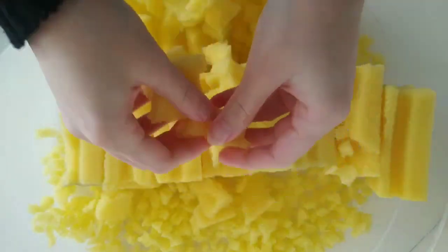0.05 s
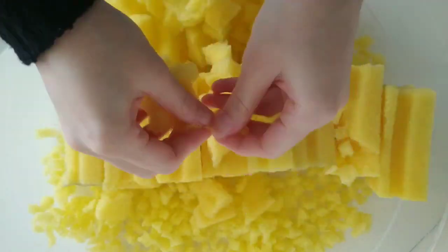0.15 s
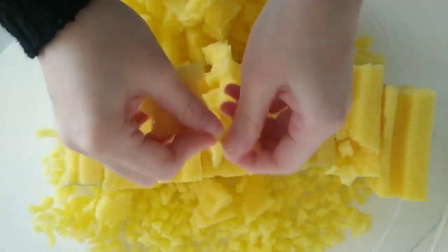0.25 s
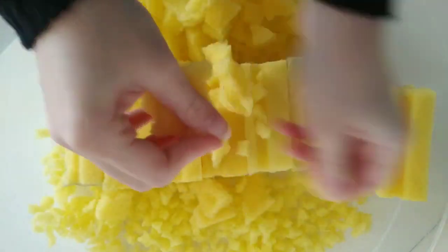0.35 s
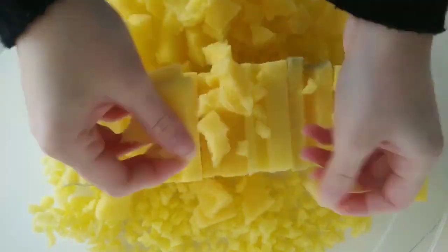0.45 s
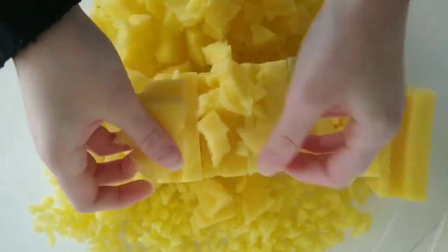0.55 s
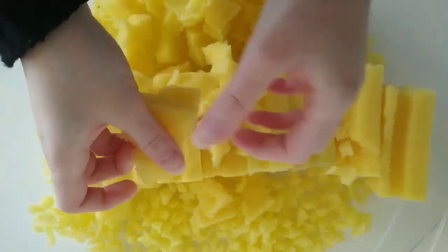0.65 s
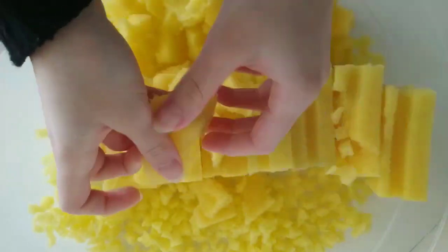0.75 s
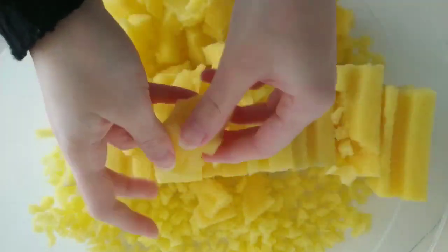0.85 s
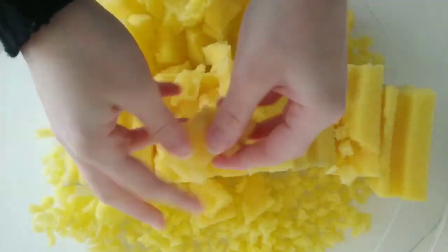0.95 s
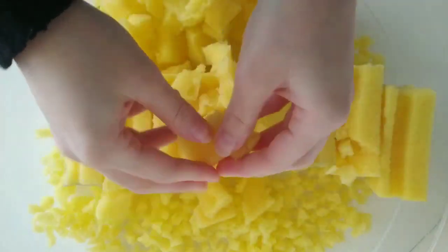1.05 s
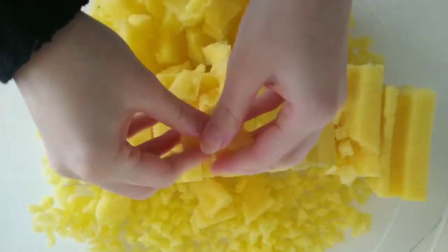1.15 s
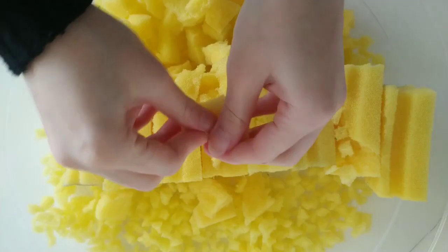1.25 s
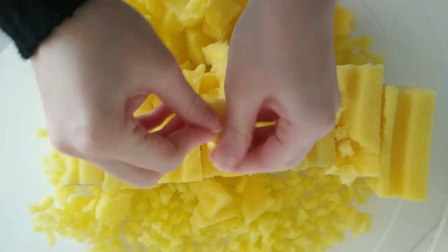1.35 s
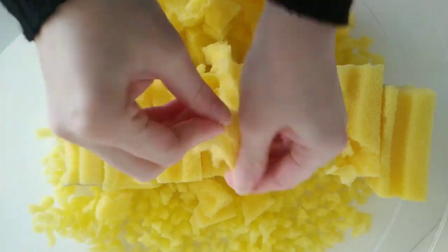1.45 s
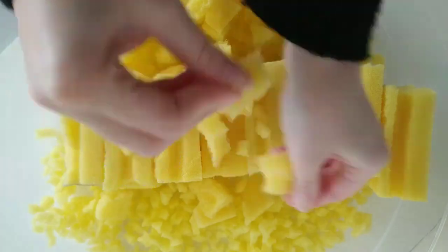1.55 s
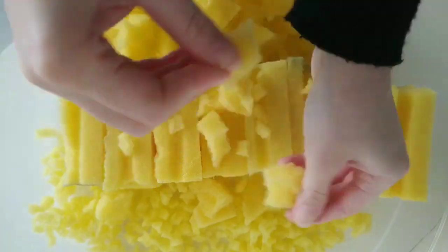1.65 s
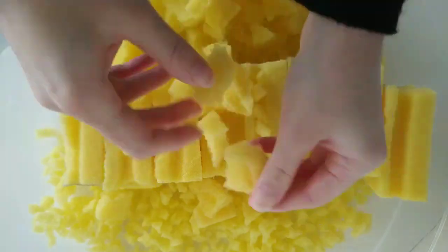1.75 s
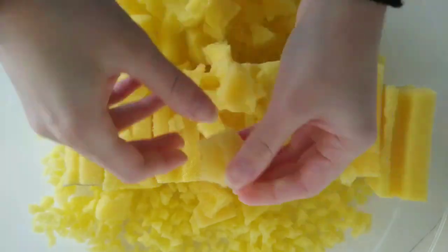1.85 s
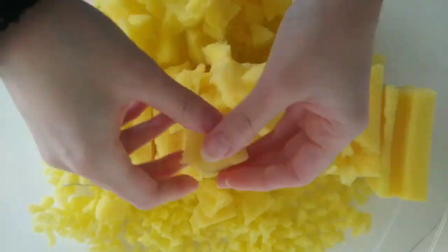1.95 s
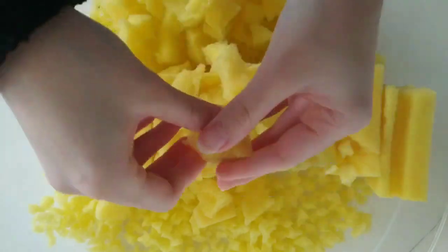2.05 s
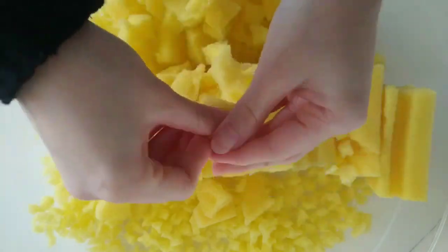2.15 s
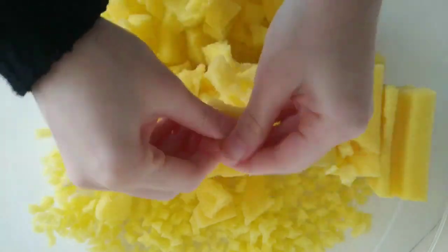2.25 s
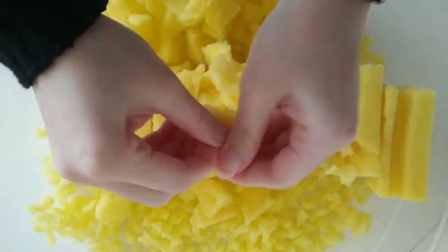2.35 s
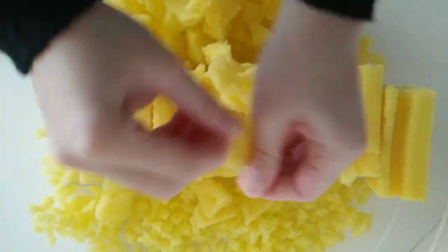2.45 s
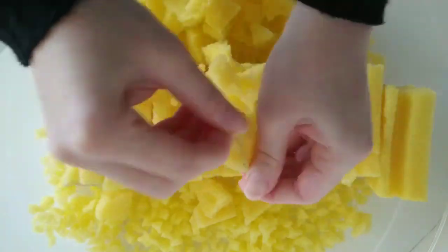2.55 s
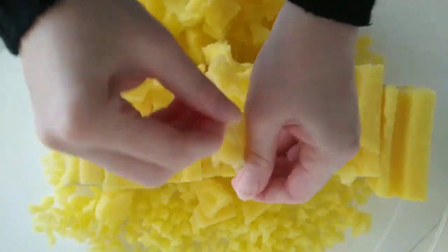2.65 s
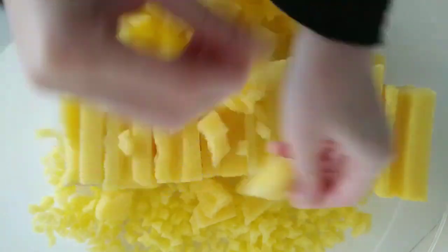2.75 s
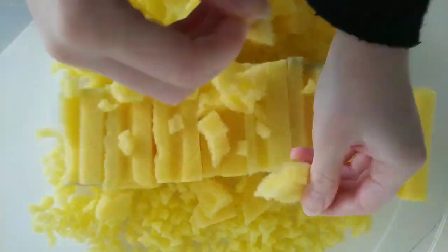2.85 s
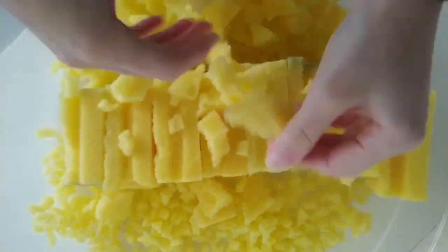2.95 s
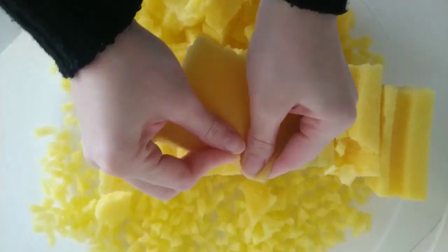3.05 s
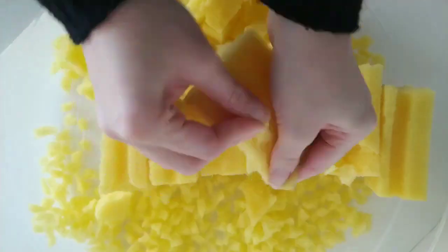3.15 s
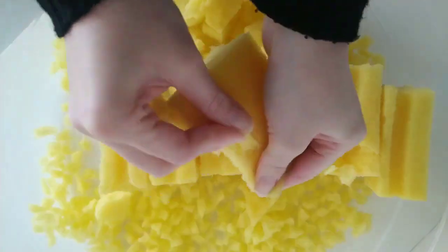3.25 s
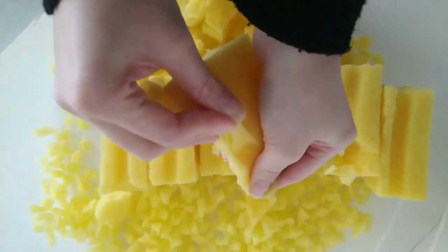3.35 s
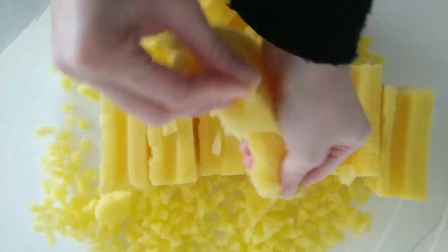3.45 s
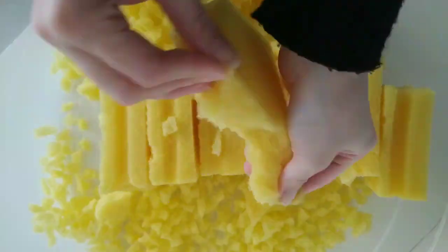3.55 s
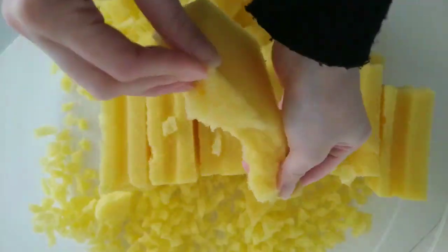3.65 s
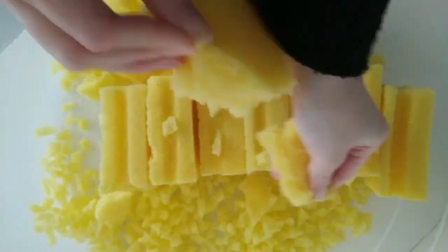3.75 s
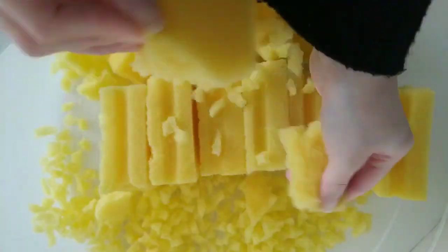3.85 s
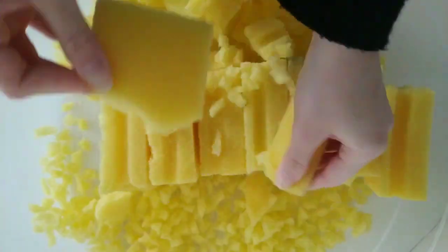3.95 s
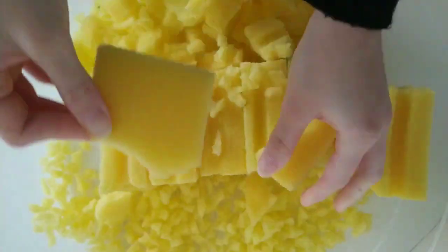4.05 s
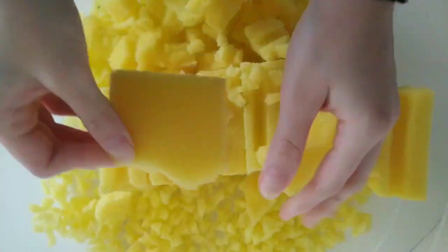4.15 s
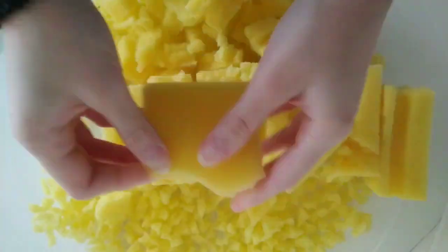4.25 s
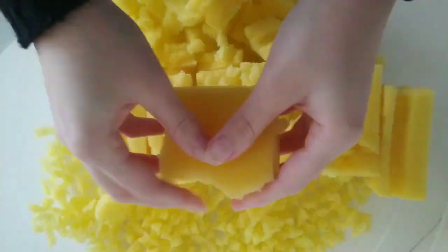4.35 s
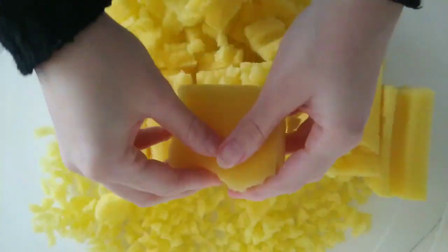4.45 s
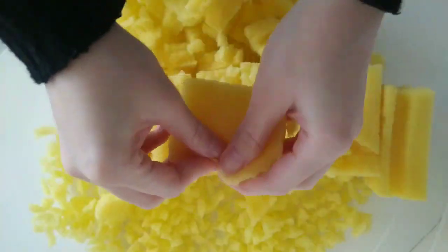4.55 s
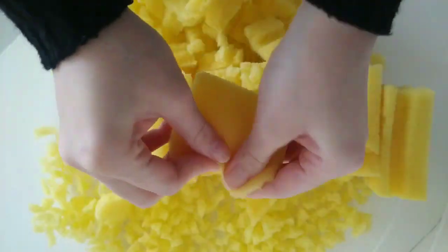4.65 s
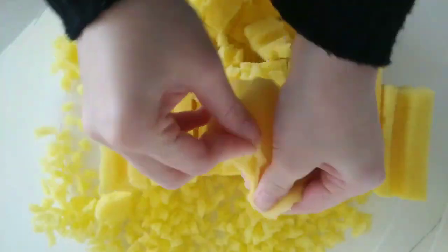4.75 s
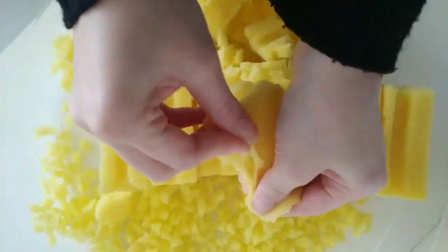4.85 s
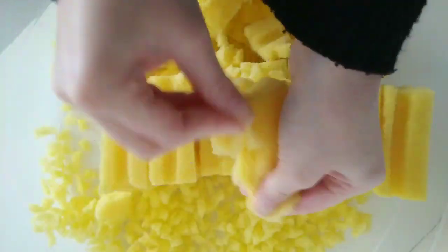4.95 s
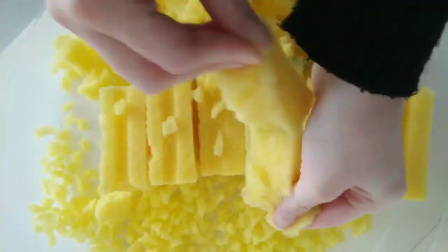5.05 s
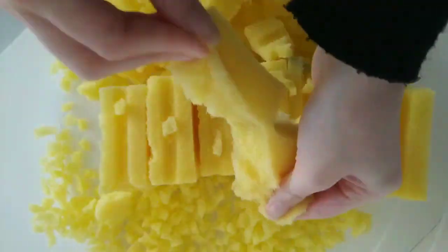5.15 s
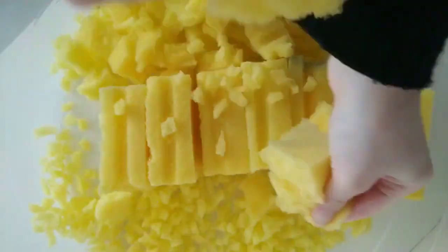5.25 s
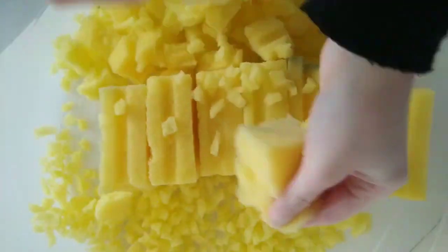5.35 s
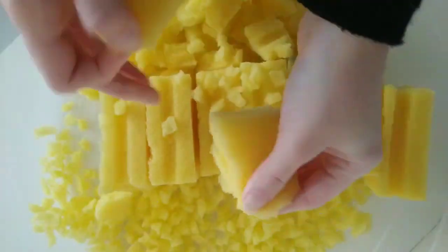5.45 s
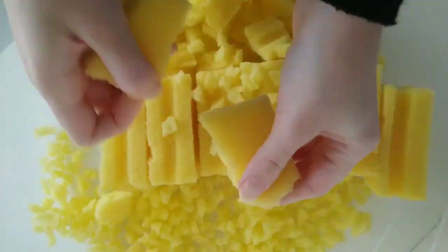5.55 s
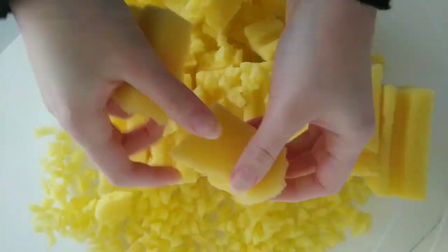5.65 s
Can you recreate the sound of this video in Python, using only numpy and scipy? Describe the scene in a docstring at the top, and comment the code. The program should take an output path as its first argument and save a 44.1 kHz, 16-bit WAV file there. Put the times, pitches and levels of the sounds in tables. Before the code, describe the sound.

Close, nearly central sound of brittle foam being ripped: dense tiny crackles that swell and stop abruptly. Thin strips give brief, airy tears in the first three seconds; a thick piece then tears harder and fuller in two groups, each ending with a snap and a dull flap of freed foam. Fingers brush and lightly squeak on the foam between. Short room reflections, slight treble width, low murmur and soft hiss underneath.

```python
"""A dry foam sponge is torn by hand close to a microphone in a small, quiet room: thin strips, then a slab.
Each tear is a dense run of random clicks, the snapping cell walls, that come faster with the pull.
The clicks excite colouring filters, the foam body and the hollow between the hands; tough strands tick.
Freed foam flaps back as damped swings, and fingers brush the foam as fine-grained noise.
Room reflections follow, the treble has a slight stereo spread, and a room murmur lies beneath."""
import sys
import numpy as np
from scipy import signal
from scipy.fft import rfft, irfft
from scipy.io import wavfile

SR = 44100
rng = np.random.default_rng(int(sys.argv[2]) if len(sys.argv) > 2 else 0)


def output_pcm(signal):
    """Save a mono or channel-first signal as 16-bit PCM at the path in sys.argv[1].

    Samples are clipped to [-1, 1] before scaling.
    """
    pcm = np.clip(np.atleast_2d(signal).T, -1, 1) * 32767
    wavfile.write(sys.argv[1], SR, np.round(pcm).astype(np.int16))


N = 250488
TIME = np.arange(N) / SR  # seconds

# Tugs on the thin strips and on the thick slab. Each row: start in seconds, catch time in seconds,
# length in seconds, crackle level at the end of the pull in dB, rise over the pull in dB
# (negative: a fall), let-go time in seconds.
THIN_TUGS = [(0.357, 0.01, 0.057, -31, 12.5, 0.0088), (1.383, 0.0038, 0.058, -48.5, 2.5, 0.017),
             (1.437, 0.02, 0.16, -36, 3.5, 0.015), (1.586, 0.0092, 0.013, -29, -0.5, 0.019),
             (2.488, 0.0095, 0.055, -33.5, 5.5, 0.052), (2.684, .014, .085, -28.5, 14.5, .012)]
THICK_TUGS = [(3.112, .012, 0.098, -28, 25, 0.068), (3.335, 0.036, 0.16, -32, 4.5, 0.021),
              (3.493, 0.016, 0.078, -25, -0.5, 0.05), (3.722, 0.022, .068, -32.5, -2, 0.026),
              (3.791, 0.014, 0.015, -22.5, 1.5, 0.025), (4.764, 0.012, .058, -31, 7, 0.078),
              (4.912, 0.023, 0.12, -33, 12.5, .02), (5.028, 0.024, .072, -24.5, 3, 0.05),
              (5.233, 0.0079, 0.011, -34.5, -1, .016), (5.254, 0.01, 0.037, -26, 4.5, .013)]
# Relative spectrum of a snapping cell wall. Each row: frequency in Hz, level in dB.
THIN_SNAP_COLOUR = [(60, -25), (400, -25), (700, -8.5), (1050, -14), (1500, -9), (2100, -8.5), (3200, -2.5),
                    (4100, -6), (4700, -12.5), (5700, 1), (7400, -6), (9500, -1), (12500, -9.5),
                    (16000, -8)]
THICK_SNAP_COLOUR = [(60, -28), (300, -0.5), (850, -1), (1400, -4), (2600, -1.5), (4500, -1.5), (6500, 0),
                     (8200, 0), (10300, -2), (12500, -8.5), (16000, -14.5)]
# Relative spectrum of the foam body shaken by the tear. Each row: frequency in Hz, level in dB.
THIN_BODY_COLOUR = [(45, -63), (130, -0.5), (250, -5), (380, -5.5), (560, 3.5), (750, 1), (1200, -32.5)]
THICK_BODY_COLOUR = [(45, -42), (115, -3), (230, -2), (330, 0.5), (450, -8), (600, -6.5), (1100, -26.5)]
# Resonances of the slab cupped in the hands. Each row: frequency in Hz, width in Hz,
# level over the direct sound in dB, before the cupping gain.
SLAB_RESONANCES = [(1394, 180, -1), (1796, 70, 11.5), (2180, 30, -23), (3700, 130, 1), (5630, 240, 4),
                   (7500, 76, -28), (9100, 290, -4)]
# How the slab is held. Each row: time in seconds, cupping (strength of the hollow's ring) in dB,
# bulk (how much foam is shaken) in dB.
SLAB_HOLD = [(3.55, -3, -10), (3.8, 0, -9), (4.8, -23, -8), (5.099, -5, -7.5)]
# The freed foam flaps back. Each row: start of the swing in seconds, peak of the swing in dB,
# frequency of the swing in Hz, peak of the edge's flick in dB; both peaks before the bass cut.
FLAP_EVENTS = [(.417, -46, 220, -28.5), (1.598, -25, 242, -27.5), (1.6074, -22, 310, -19.5),
               (2.753, -25, 342, -21.5), (2.771, -25, 280, -21.5), (3.8211, -11, 206, -13),
               (5.2907, -5.5, 258.5, -25)]
# The toughest strands break. Each row: time in seconds, peak in dB, ring frequency in Hz.
STRAND_BREAKS = [(.354, -39, 7060), (0.4128, -26, 3400), (1.386, -35.5, 6270), (1.595, -20, 2620),
                 (2.474, -36, 9300), (2.496, -40, 6100), (2.769, -21, 2740), (3.14, -30, 7000),
                 (3.33, -38, 3560), (3.358, -28, 3900), (3.684, -34, 6900), (3.698, -32.5, 6900),
                 (3.705, -30, 5570), (3.8199, -9, 1770), (4.477, -39, 4960), (5.2895, -10, 4000)]
# The firmer brushes of the fingers. Each row: middle in seconds, level in dB (before the gains of
# rustle and squeak), half length in seconds.
FINGER_BRUSHES = [(0.059, -59.5, 0.049), (.212, -57.5, 0.028), (0.558, -59, 0.014), (0.862, -58.5, 0.025),
                  (1.014, -61, 0.027), (1.213, -57.5, .012), (1.805, -60.5, 0.01), (2.437, -60, .022),
                  (2.978, -60, 0.0087), (3.999, -59, 0.12), (4.104, -46, .015), (4.393, -52.5, 0.023),
                  (4.49, -54, 0.016), (4.587, -59.5, 0.028), (5.456, -52.5, 0.011), (5.651, -51.5, 0.016)]
# Relative spectrum of the finger rustle. Each row: frequency in Hz, level in dB.
RUSTLE_COLOUR = [(45, -24), (140, 8), (300, 13), (900, 0.5), (1800, -0.5), (3300, -3), (4600, -5.5),
                 (5900, 0), (7500, -6.5), (9500, -3.0), (12000, -12), (16000, -12)]
# Soft low thumps: bumps of the hands, and the deep part of the strong flap at 3.82 s.
# Each row: start in seconds, peak before the bass cut in dB, frequency in Hz.
LOW_THUMPS = [(.085, -39.5, 140), (2.783, -41.5, 103), (3.8194, -25.5, 132), (4.371, -37.5, 110)]
# Dull echoes from the nearest walls. Each row: delay in seconds, level in dB.
NEAR_WALL_ECHOES = [(0.0169, -17), (0.0774, -29.5)]
# Relative spectrum of the reverberant tail. Each row: frequency in Hz, level in dB.
TAIL_COLOUR = [(80, -18.5), (230, 13), (400, -6), (800, 3.5), (3000, -0.5), (8000, -5), (15000, -8)]
# Low standing waves of the room. Each row: frequency in Hz, time to decay by 60 dB in seconds,
# amplitude in dB before build-up and decay.
STANDING_WAVES = [(234.8, 0.18, -60), (270, 0.18, -60), (529, 0.3, -65.5)]
# Relative spectrum of the stereo spread. Each row: frequency in Hz, level in dB.
STEREO_SPREAD_COLOUR = [(3300, -66), (4000, -24), (4600, -2.5), (5600, -23), (7500, -12), (9500, -20),
                        (11000, -2), (13000, 4), (16000, 0)]
# Relative spectrum of the room noise. Each row: frequency in Hz, density in dB per Hz.
ROOM_NOISE_COLOUR = [(15, -65), (25, -12), (69, -16.5), (122, -1), (215, 1.5), (281, -3.5), (349, -9),
                     (509, -11.5), (631, -11), (684, -17), (919, -19.5), (1490, -23.5), (1710, -25),
                     (2490, -25), (15500, -32.5)]

LET_GO_DB = 21.5  # fall of a tug's crackle over its let-go time, ever faster
STRETCH_S, STRETCH_TICKS_PER_S, STRETCH_DB = 0.043, 1500, -59.5  # faint ticks ahead of each tug
# The light torn edge flicks just ahead of the swing; either swells for a part of its own cycle.
FLICK_HZ, FLICK_LEAD_S, SWELL_CYCLES = 528, 0.00404, 0.76
SCRATCH_HZ, SCRATCH_SCATTER = 3210, 0.13  # squeak pitch and its relative spread between strokes
LOW_THUMP_SWELL_S = 0.0075
ROOM_NOISE_DB = -55  # rms before the low wavering
TOP_HZ = 15900


def thin_strips(body_db=-13.0):
    """Light structures: narrow strips have little mass to shake and give a light, bright rip."""
    crackle, shake = rip(THIN_TUGS, THIN_SNAP_COLOUR, THIN_BODY_COLOUR, cells_per_s=14000,
                         scatter_db=2.0, jerk_db=1.1, body_growth=0.61, usual_db=-37)
    return crackle + undb(body_db) * shake


def thick_slab(drift=0.012):
    """Cavity resonance: the coarser rip rings the hollow between the hands, whose size wanders."""
    crackle, shake = rip(THICK_TUGS, THICK_SNAP_COLOUR, THICK_BODY_COLOUR, cells_per_s=11000,
                         scatter_db=1.5, jerk_db=1.6, body_growth=0.67, usual_db=-26.5)
    hold_s, cupping_db, bulk_db = np.transpose(SLAB_HOLD)
    cupping = undb(np.interp(TIME, hold_s, cupping_db))
    bulk = undb(np.interp(TIME, hold_s, bulk_db))
    # a crossfade between two tunings stands for the hollow widening and narrowing
    narrow = .5 + .5 * np.tanh(2 * walk(18))
    ringing = narrow * hollow(crackle, 1 + drift) + (1 - narrow) * hollow(crackle, 1 - drift)
    return undb(-2) * (crackle + cupping * ringing) + bulk * shake


def rip(tugs, colour, body, cells_per_s, scatter_db, jerk_db, body_growth, usual_db,
        coarsening=0.49, dulling=0.27):
    """Fracture noise: cell walls snap more often the harder the pull, as the crack front jerks along."""
    pulls = [pull(tug) for tug in tugs]
    effort = np.maximum(sum(pulls) / undb(usual_db), .1)  # 1 = the usual pull
    jerks = undb(jerk_db * walk(260))
    cells = clicks(cells_per_s * np.sqrt(effort), scatter_db) * jerks
    snaps = sum(grip(cells * strength) for strength in pulls)
    crackle = convolve(snaps, response(colour))
    # a gentle pull breaks only the finest walls; a hard one breaks whole bundles, which sound lower
    coarse = band(crackle, 1860, "low")
    fine = band(crackle, 7800, "high")
    crackle = crackle + coarse * (effort ** coarsening - 1) + fine * (effort ** -dulling - 1)
    # a hard pull also moves more of the foam, so the lows grow faster than the crackle
    shake = convolve(snaps * effort ** body_growth, response(body))
    return crackle, shake


def pull(tug):
    """Loading and release: the amplitude takes hold, changes steadily in dB, then falls ever faster."""
    start_s, catch_s, length_s, db, build_db, let_go_s = tug
    t = TIME - start_s
    catching = np.clip(t / catch_s, 0, 1) ** 1.2
    building = build_db * (np.clip(t / length_s, 0, 1) - 1)
    easing = LET_GO_DB * (np.maximum(t - length_s, 0) / let_go_s) ** 2
    return catching * undb(db + building - np.minimum(easing, 200))


def grip(x, bounce_db=-8, bounce_s=0.0014):
    """Multipath interference: each grip shapes the hands anew, and bounces between them tint the sound."""
    t = TIME[:SR // 100]
    bounces = band(rng.standard_normal(len(t)), 860, "high") * np.exp(-t / bounce_s) * (t > .0002)
    bounces = undb(bounce_db) * bounces / np.sqrt(np.sum(bounces ** 2))
    return (x + convolve(x, bounces)) / np.sqrt(1 + undb(bounce_db) ** 2)


def hollow(x, tuning):
    """Modal superposition: damped resonances of the cupped slab, all shifted by one factor."""
    t = TIME[:SR // 20]
    rings = np.zeros(len(t))
    for hz, width_hz, db in SLAB_RESONANCES:
        gain = undb(db) * 2 * np.pi * width_hz / SR
        decay = np.exp(-np.pi * width_hz * t)
        rings += gain * decay * np.cos(2 * np.pi * hz * tuning * t)
    return convolve(x, rings)


def strands(decay_s=0.0012, ring_db=2):
    """Impulsive fracture: a tough strand goes with a sharp noisy tick and rings for an instant."""
    out, t = np.zeros(N), TIME[:SR // 50]
    ring_decay = np.exp(-t / .0012)
    for at_s, db, hz in STRAND_BREAKS:
        burst = rng.standard_normal(len(t)) * np.exp(-t / decay_s)  # a few cells go with it
        tick = convolve(burst, response(THICK_SNAP_COLOUR))
        tick = tick + undb(ring_db) * ring_decay * np.sin(2 * np.pi * hz * t)
        add(out, at_s, undb(db) * tick / np.abs(tick).max())
    return out


def flaps():
    """Elastic recoil: the light torn edge flicks back first, then the whole piece swings after it."""
    flicks, swings = [], []
    for at_s, swing_db, swing_hz, flick_db in FLAP_EVENTS:
        flicks.append((at_s - FLICK_LEAD_S, flick_db, FLICK_HZ, SWELL_CYCLES / FLICK_HZ))
        swings.append((at_s, swing_db, swing_hz, SWELL_CYCLES / swing_hz))
    return thumps(flicks + swings)


def thumps(swings, lowest_hz=95):
    """Heavily damped oscillation: each swing of soft foam swells and dies within a few cycles."""
    out, t = np.zeros(N), TIME[:SR // 8]
    for at_s, db, hz, swell_s in swings:
        envelope = (t / swell_s * np.exp(1 - t / swell_s)) ** 2  # peaks at 1 after swell_s
        add(out, at_s, -undb(db) * envelope * np.sin(2 * np.pi * hz * t))
    # the swings carry no deep bass
    return signal.sosfilt(signal.butter(3, lowest_hz, "high", fs=SR, output="sos"), out)


def stretching():
    """Precursor emission: faint ticks gather as the foam stretches, just before each tug takes hold."""
    tension = np.zeros(N)
    for start_s, *_ in THIN_TUGS + THICK_TUGS:
        tension += np.exp(-np.abs(TIME - start_s) / STRETCH_S) * (TIME < start_s)
    ticks = tension * clicks(per_s=STRETCH_TICKS_PER_S, scatter_db=2.0)
    return undb(STRETCH_DB) * convolve(ticks, response(THICK_SNAP_COLOUR))


def fingers(resting_db=-67.5, scratch_db=-4, scratch_width_hz=550):
    """Friction noise: skin drags over open cells with a fine-grained rustle and a slight squeak per stroke."""
    grains = clicks(per_s=3500, scatter_db=3.0) * undb(1.86 * walk(220))
    t = TIME[:SR // 100]
    power = undb(resting_db + 2 * walk(10)) ** 2  # a light touch throughout
    squeaks = np.zeros(N)
    for at_s, db, half_s in FINGER_BRUSHES:
        near = np.abs(TIME - at_s) < 4 * half_s
        stroke = undb(db) * np.exp(-.5 * ((TIME[near] - at_s) / half_s) ** 2)
        power[near] += stroke ** 2
        hz = SCRATCH_HZ * np.exp(SCRATCH_SCATTER * rng.standard_normal())
        ring = np.exp(-np.pi * scratch_width_hz * t) * np.cos(2 * np.pi * hz * t)
        ring = ring / np.sqrt(np.sum(ring ** 2))
        squeaks[near] += convolve(stroke * rng.standard_normal(len(stroke)), ring)
    rustle = convolve(np.sqrt(power) * grains, response(RUSTLE_COLOUR))
    return undb(2.0) * rustle + undb(scratch_db) * squeaks


def low_thumps():
    """Damped oscillation: soft low swings for bumps of the hands and the deep part of the strong flap."""
    return thumps([(at_s, db, hz, LOW_THUMP_SWELL_S) for at_s, db, hz in LOW_THUMPS])


def room(dry, t60_s=0.46, tail_db=-24, early_s=0.0098, early_db=-14):
    """Reverberation: quick table reflections, wall echoes, a faint tail and low standing waves."""
    t = TIME[:SR * 3 // 4]
    early, tail = rng.standard_normal((2, len(t)))
    early = early * np.exp(-t / early_s) * (t > .001)
    early = unit(band(early, 275, "high"))
    tail = tail * np.exp(-np.log(1000) * t / t60_s) * (t > .008)
    tail = unit(convolve(tail, response(TAIL_COLOUR)))
    echoes = (undb(early_db) * early + undb(tail_db) * tail) / np.sqrt(len(t))
    for delay_s, db in NEAR_WALL_ECHOES:
        echo = signal.unit_impulse(len(t), int(delay_s * SR))
        echoes = echoes + undb(db) * band(echo, 830, "low")
    build_up = 1 - np.exp(-t / .04)
    for hz, mode_t60_s, db in STANDING_WAVES:
        decay = np.exp(-np.log(1000) * t / mode_t60_s)
        echoes = echoes + undb(db) * build_up * decay * np.sin(2 * np.pi * hz * t)
    return dry + convolve(dry, echoes)


def stereo_spread(sound, spread_db=-12, decay_s=0.0033):
    """Decorrelation: a short random filter, opposite in sign left and right, spreads the treble slightly."""
    t = TIME[:SR // 50]
    smear = rng.standard_normal(len(t)) * np.exp(-t / decay_s) * (t > .0005)
    smear = unit(smear) / np.sqrt(len(t))
    side = convolve(convolve(sound, smear), response(STEREO_SPREAD_COLOUR))
    return sound + undb(spread_db) * side * np.array([[1], [-1]])


def room_noise():
    """Filtered random noise: a low murmur of air wavers under a steady hiss."""
    air = undb(ROOM_NOISE_DB) * convolve(rng.standard_normal(N), response(ROOM_NOISE_COLOUR))
    waver = undb(0.98 * walk(7.9))
    return air + band(air, 650, "low") * (waver - 1)


def clicks(per_s, scatter_db):
    """Random impulse train: clicks of scattered size at a given rate, with mean power near 1."""
    chance = np.clip(per_s / SR, 1e-4, 1)
    sizes = unit(rng.standard_normal(N) * undb(scatter_db * rng.standard_normal(N)))
    # the cells are all of a kind, so none is far louder than the rest
    sizes = unit(np.tanh(sizes / 3))
    return (rng.random(N) < chance) * sizes / np.sqrt(chance)


def walk(per_s):
    """Slow random modulation: lines between random knots, per_s knots a second, with spread near 1."""
    knots = rng.standard_normal(N // 20)
    return 1.22 * np.interp(TIME * per_s, np.arange(len(knots)), knots)


def response(points, size=4096):
    """Minimum-phase filter: a causal, unit-energy impulse response shaped by (Hz, dB) points."""
    hz, db = np.transpose(points)
    bins_hz = np.maximum(np.arange(size // 2 + 1) * SR / size, 1)
    gain = undb(np.interp(np.log(bins_hz), np.log(hz), db))
    # folding the cepstrum onto positive times makes the response causal
    cepstrum = irfft(np.log(gain))
    cepstrum[1:size // 2] *= 2
    cepstrum[size // 2 + 1:] = 0
    h = irfft(np.exp(rfft(cepstrum)))
    return h / np.sqrt(np.sum(h ** 2))


def convolve(x, impulse_response):
    """Linear filtering: pass a sound through an impulse response, keeping its length."""
    return signal.oaconvolve(x, impulse_response)[:len(x)]


def band(x, hz, side):
    """Zero-phase filtering: the part of a sound below ("low") or above ("high") a frequency."""
    return signal.sosfiltfilt(signal.butter(2, hz, side, fs=SR, output="sos"), x)


def add(track, at_s, sound):
    """Superposition: mix a short sound into a track."""
    start = max(int(at_s * SR), 0)
    track[start:start + len(sound)] += sound[:N - start]


def undb(db):
    """Logarithmic level: decibels to amplitude gain."""
    return 10 ** (np.asarray(db) / 20)


def unit(x):
    """Power normalisation: scale to rms 1."""
    return x / np.sqrt(np.mean(x ** 2))


def scene():
    """Superposition: all foam and hand sounds share one central position; the room noise lies beneath."""
    tearing = thin_strips() + thick_slab() + strands() + flaps() + stretching()
    handling = fingers() + low_thumps()
    return stereo_spread(room(tearing + handling)) + room_noise()


def record(dry):
    """Band limiting: a steep elliptic low-pass cuts the top of the treble."""
    return signal.sosfilt(signal.ellip(10, .1, 70, TOP_HZ, fs=SR, output="sos"), dry)


dry = scene()
out = record(dry)
output_pcm(out)
```